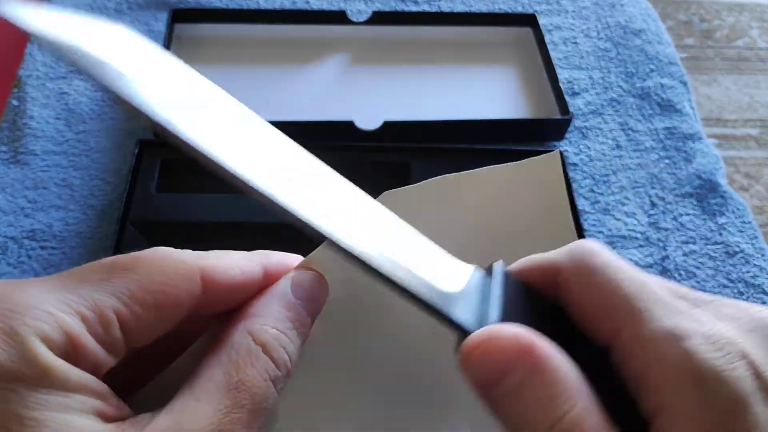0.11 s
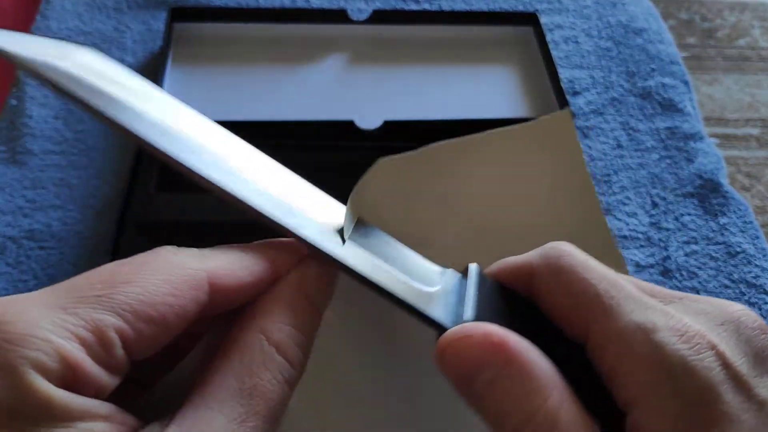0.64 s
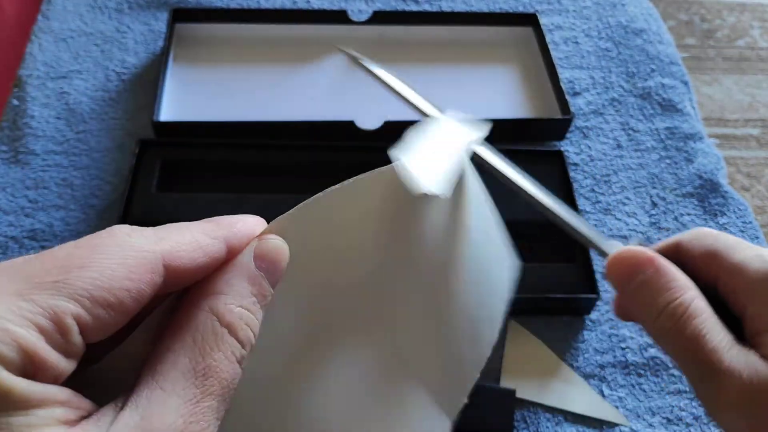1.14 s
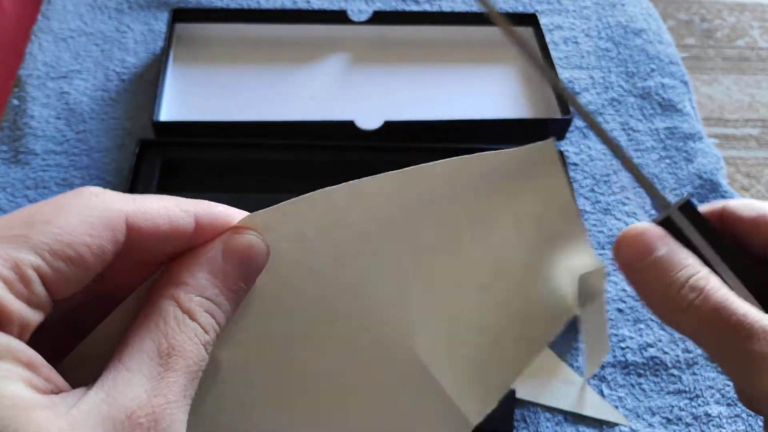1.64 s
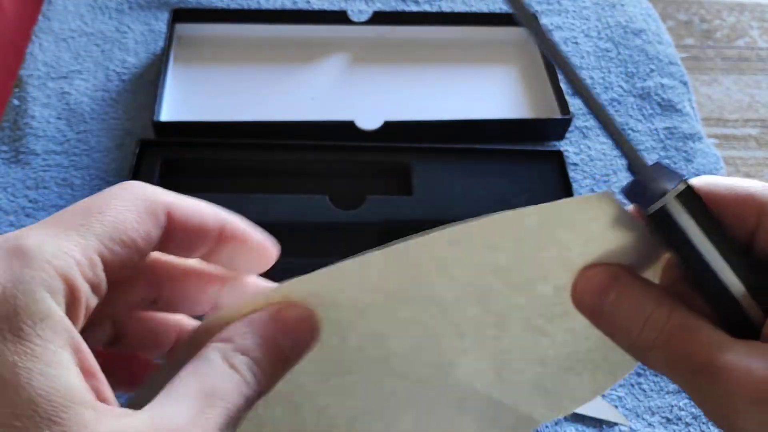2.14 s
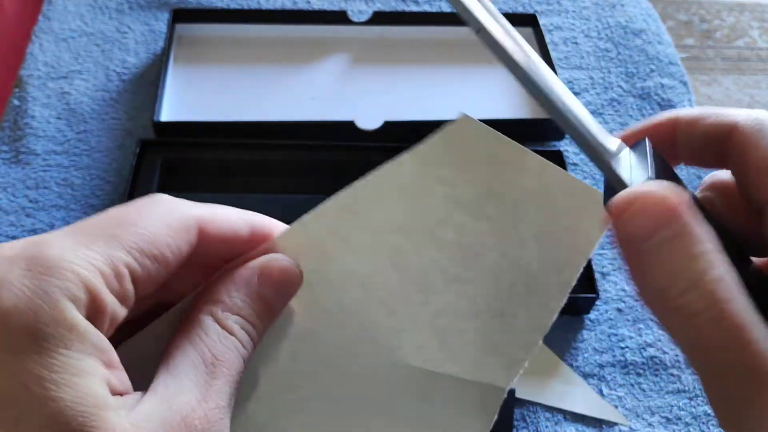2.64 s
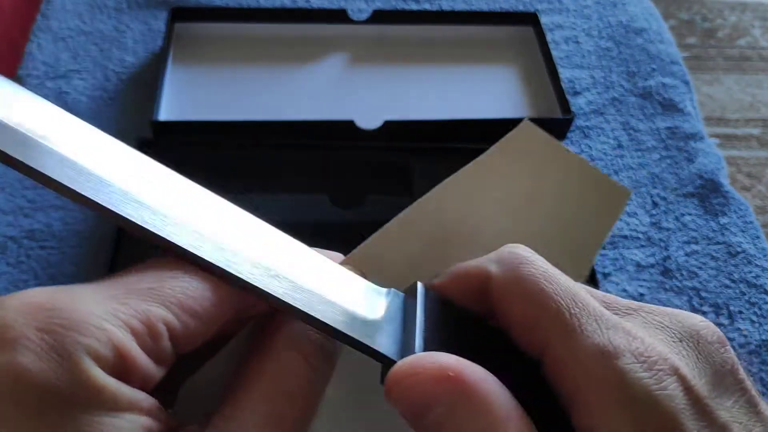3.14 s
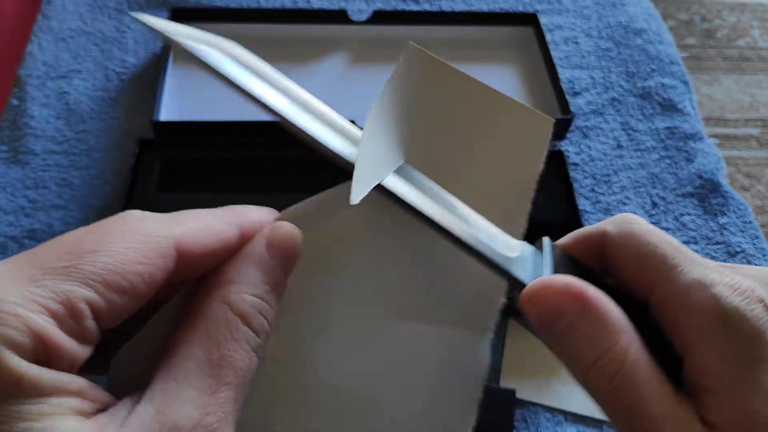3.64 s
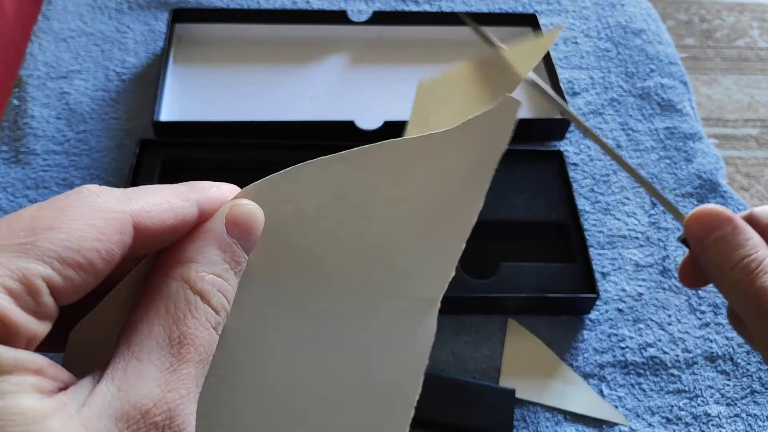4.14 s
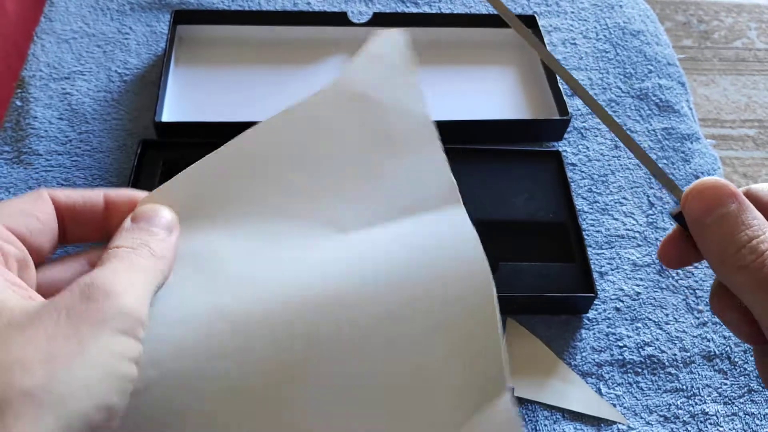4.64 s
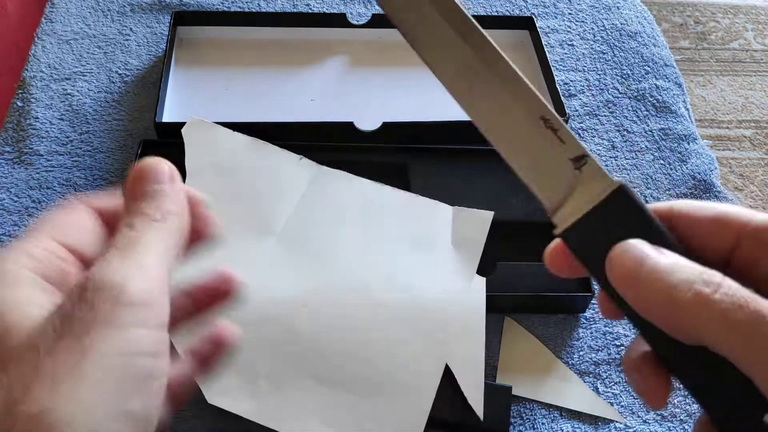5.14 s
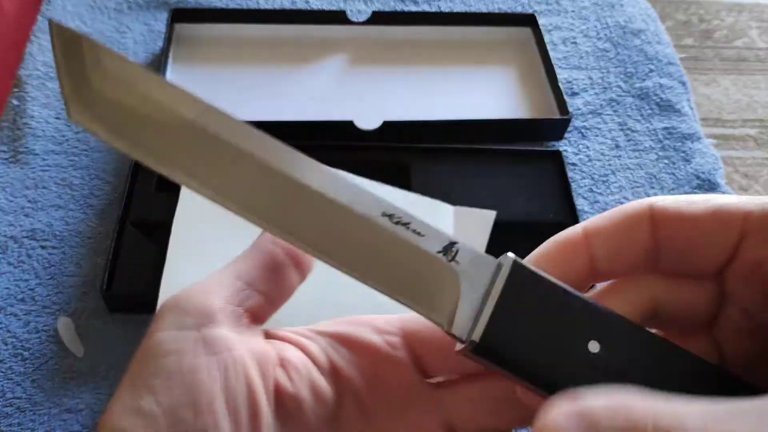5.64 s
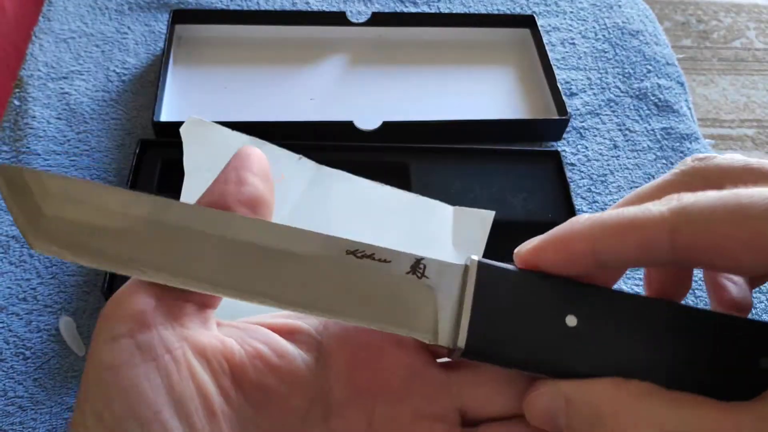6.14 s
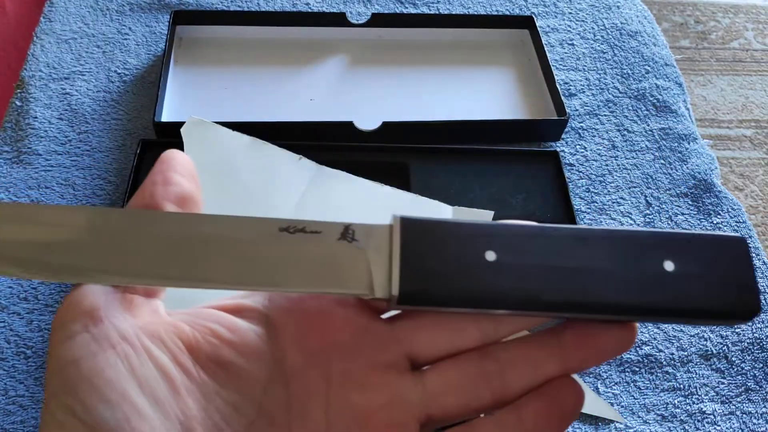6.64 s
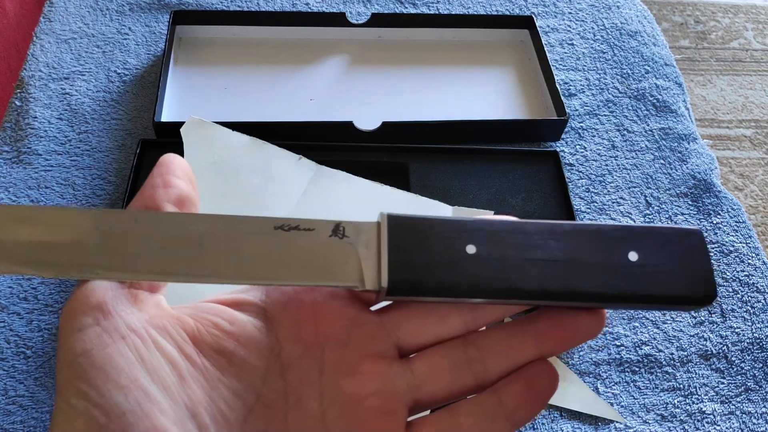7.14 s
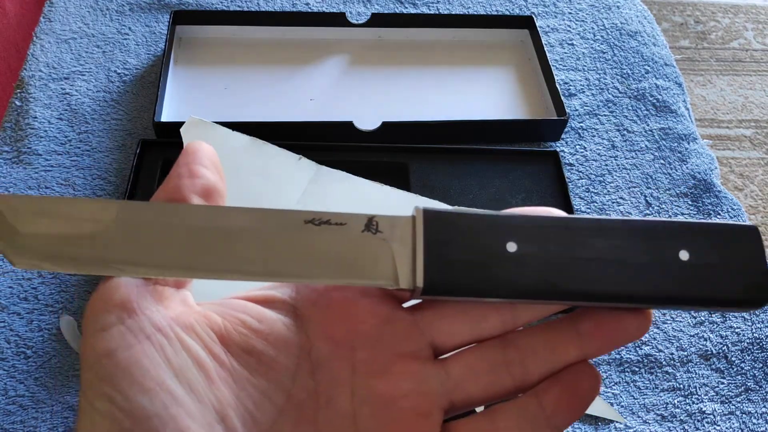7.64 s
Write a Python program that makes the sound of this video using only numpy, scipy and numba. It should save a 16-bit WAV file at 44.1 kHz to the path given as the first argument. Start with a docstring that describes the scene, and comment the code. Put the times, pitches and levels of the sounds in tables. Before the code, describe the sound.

In a quiet furnished room, a blade slices a held sheet of paper with a long, bright, grainy rip ending in a sharp flap. Small rustles, ticks and a firmer paper pop follow, then a second similar cut. The sheet is dropped with a crisp crackle, leaving faint rubs over low rumble and soft hiss. Close phone microphone, left side brighter.

```python
"""Two long tearing cuts through a hand-held sheet of paper, with rustles and ticks between and after them.
Each cut is a dense hail of random snaps, split into bands that swell and fade as the fibres part.
Offcuts drop and fingers slide as a thinner hail; the sheet ticks as it buckles, in cracks and short bursts.
A quiet room adds a soft tail, rumble, drones and hiss. The left port of the phone that listens
is bright; the right one is dull and slightly nearer."""
import sys
import numpy as np
from scipy import signal
from scipy.fft import rfft, irfft, next_fast_len
from scipy.io import wavfile
from scipy.ndimage import uniform_filter1d, map_coordinates
from numba import njit

SR = 44100
rng = np.random.default_rng(int(sys.argv[2]) if len(sys.argv) > 2 else 0)


def master(y):
    """Save y as 16-bit WAV."""
    cut = np.clip(np.atleast_2d(y).T, -1, 1)
    pcm = np.round(cut * 32767)  # scale
    wavfile.write(sys.argv[1], SR, pcm.astype(np.int16))


def gain_from_db(level_db):
    """Turn a decibel level (scalar or array-like) into a linear amplitude factor."""
    decades = np.asarray(level_db, float) / 20
    return 10 ** decades


N = 342656  # length in samples
SIZE = next_fast_len(N + SR // 2, real=True)  # room for the tail after the end
HZ = np.arange(SIZE // 2 + 1) * SR / SIZE + 1e-3  # just above zero, to allow logarithms
TIME = np.arange(N) / SR  # seconds

# Colour of the air rumble. Each row: frequency in Hz, relative level in dB per Hz.
ROOM_TONE = [(12, -32), (20, -3.5), (59, 2), (93, -7.5), (140, -12), (229, -10.5), (296, -16.5), (382, -16),
             (637, -18.5), (776, -15), (982, -15.5), (1320, -16), (2200, -27.5), (2860, -45), (4840, -120)]
# Colour of the microphone hiss. Each row: frequency in Hz, relative level in dB per Hz.
HISS = [(1500, -10), (2400, 1), (3000, 1), (4000, -1), (8000, -2.5), (10000, -1.5), (12500, 2), (14300, 0),
        (15000, -30)]
# Far machinery. Each row: frequency in Hz, width in Hz, level in dB before its slow wander.
DRONES = [(40, 14, -80), (62, 16, -75), (146, 6, -75), (195, 20, -84)]
# Balance of the rumble and hiss. Each row: frequency in Hz, left minus right in dB.
TONE_PORTS = [(300, 0.5), (4000, -0.5), (7000, -3.5), (9500, 1.5), (12500, 12), (14300, 6.5)]
# How alike the room tone is at both ports. Each row: frequency in Hz, common share of the power (0 to 1).
TONE_LIKENESS = [(60, 0.98), (300, 0.28), (700, 0.22), (1400, 0.044), (3000, .02)]

# Balance of the paper sounds. Each row: frequency in Hz, left minus right in dB.
PORTS = [(300, 1), (1500, 1), (3500, -0.5), (6200, -8), (8000, 0.5), (9500, 8), (11000, 20), (12500, 28.5),
         (14300, 25.5)]
# How alike the paper is at both ports. Each row: frequency in Hz, common share of the power (0 to 1).
LIKENESS = [(200, .975), (700, .965), (1400, .93), (2200, .75), (4000, .4), (7000, .1), (14000, .05)]

# Bump, body, scrape and sizzle of the rustle. Each row: lower edge in Hz, upper edge in Hz.
WIDE_BANDS_HZ = [(110, 350), (250, 2800), (3000, 9000), (9000, 14600)]
# Colour of rustles and ticks. Each row: frequency in Hz, relative level in dB per Hz.
SLIDE_COLOUR = [(59, -20.5), (100, 10), (260, -1), (982, -1.5), (1180, -5), (1580, -2), (2950, -0.5),
                (6770, -1.5), (9840, -9.5), (12600, 0), (14300, -1)]
# The sheet or an offcut flaps and dies away. Each row: start in seconds, base time to fall 60 dB in seconds,
# base level in dB, tilt in dB per band towards the treble, centre of the body in Hz.
FLAPS = [(1.144, 0.27, -41, 2.5, 1090), (1.47, 0.1, -57, -5, 880), (1.53, 0.17, -64, 8, 840),
         (1.832, 0.52, -61, -4, 640), (2.156, 0.27, -57, -19, 1310), (3.94, 0.18, -38.5, -1, 1190),
         (4.122, 0.075, -56, -8, 1080), (4.219, .2, -59.5, -3.5, 1050), (4.411, 0.28, -62, 0, 1590),
         (4.45, .25, -57.5, -5, 2030), (4.583, 0.56, -68, 1, 1000), (5.043, .3, -59, -11.5, 1570)]
# How flaps share out over the four bands. Each row: offset in dB, factor on the fall time.
FLAP_BANDS = [(-18, 1.4), (-1, 0.96), (-2, 1.2), (0.5, 0.54)]
# Soft low thuds of hands and sheet. Each row: start in seconds, time to fall 60 dB in seconds,
# base level in dB.
THUDS = [(1.125, 0.18, -48.5), (1.47, .15, -58), (1.535, .15, -58), (1.83, .2, -60.5), (2.55, 0.27, -61.5),
         (3.86, .15, -54.5), (3.915, 0.16, -47.5), (4.06, .2, -63), (5.59, .15, -66)]
# Fingers and paper rub. Each row: start in seconds, length in seconds, base level in dB,
# tilt in dB per band towards the treble, centre of the body in Hz.
RUBS = [(1.239, 0.042, -62.5, 1, 870), (1.269, 0.047, -66, -13.5, 800), (1.296, 0.041, -77, 0, 710),
        (1.496, 0.018, -75, 0.5, 800), (1.532, 0.025, -68, -7, 800), (1.57, 0.15, -72, -4, 750),
        (1.692, 0.21, -71.5, -3.5, 895), (1.919, 0.072, -61, -3, 940), (2.005, 0.21, -68, -2, 680),
        (2.232, 0.21, -69.5, -2.5, 870), (2.443, 0.044, -59, 1, 840), (2.476, 0.082, -59, -4.5, 690),
        (2.538, 0.082, -74, -12.5, 570), (2.608, 0.061, -72, 11, 670), (2.68, 0.084, -74.5, 1, 900),
        (3.053, 0.15, -76.5, 0, 830), (3.972, 0.054, -54, 2, 1250), (4.03, 0.055, -70, -13, 647),
        (4.455, 0.056, -67, 6, 1900), (4.642, 0.19, -74.5, 3, 895), (4.771, 0.078, -72.5, 3, 940),
        (4.999, 0.058, -51, -3.5, 1680), (5.295, 0.21, -79.5, 14.5, 960), (5.6, 0.04, -80.5, 18.5, 965),
        (5.674, 0.13, -79, 11.5, 840), (5.82, 0.21, -75.5, 3.5, 930), (5.756, 0.77, -78, -3.5, 1300),
        (6.105, 0.24, -82.5, -8.5, 983)]
# How rubs share out: one offset in dB for each of the four bands.
RUB_BANDS_DB = [-14.5, 2, -1.5, 2]
# How many times the tilt counts in each of the four bands.
TILT_STEPS = [-1, -1, 0, 1]

# The sheet buckles or lands. Each row: start in seconds, base levels in dB of body, middle and top,
# centre of the body in Hz.
TICKS = [(0.4968, -71, -64, -61, 1490), (1.104, -58, -48, -30, 900), (1.115, -41, -36, -26, 1680),
         (1.1406, -47, -46, -35, 1090), (1.298, -61, -53, -38, 600), (1.3025, -62, -56, -42, 700),
         (1.312, -64, -55, -36, 600), (1.3165, -65, -56, -46, 700), (1.3374, -52.5, -54, -35.5, 750),
         (1.392, -68, -63, -51, 1100), (1.4725, -79, -52, -39, 1610), (1.477, -66, -52, -46, 1500),
         (1.527, -54, -47.5, -50, 735), (1.5964, -69, -61, -51, 926), (1.8344, -43.5, -58, -47, 600),
         (2.1563, -34, -32.5, -65, 1430), (2.16, -42, -26.5, -70, 1920), (2.1684, -38, -55, -63, 1470),
         (2.29, -60, -60, -62, 900), (3.317, -65, -64, -50, 1800), (3.8622, -32.5, -30, -42, 800),
         (3.938, -49, -31, -46, 2500), (4.1247, -63, -45.5, -33.5, 2500), (4.221, -74, -58.5, -65, 1100),
         (4.4099, -66, -48.5, -42.5, 1970), (4.4118, -55.5, -58, -36.5, 2000),
         (4.4273, -60, -53, -52, 1500), (4.4523, -50, -41.5, -35, 2200), (4.469, -63, -63, -51, 2200),
         (4.5809, -63.5, -57, -55, 804), (5.0028, -43, -61, -33, 1920), (5.0058, -45, -42, -24.5, 1900),
         (5.013, -44, -48, -42, 1660), (5.0263, -38, -44, -31, 1860), (5.0326, -43, -45, -48, 1690),
         (5.0432, -59, -34, -50, 2010), (5.0482, -43, -51, -36.5, 1700)]
# Time in seconds for a tick to fall 60 dB, in body, middle and top.
TICK_T60_S = (0.023, 0.016, 0.0068)

# One list per cut. Each row: time in seconds, base tearing level in dB, then in dB over it the body of the
# sheet and the edge sizzle, the sizzle centre in Hz, and the 2.5-5 kHz band in dB over tearing.
STROKES = [
    [(0.49, -60, -5, -4, 12600, -14), (0.508, -47, -11, 2, 12700, -9), (0.56, -42.5, -6, -2, 11500, -13.5),
     (0.592, -37.5, -13.5, -10.5, 12500, -4.5), (0.634, -37.5, -11, -3.5, 11300, -7.5),
     (0.702, -37, -15, 3, 12300, -7), (0.778, -33, -12.5, 1, 12800, -11.5),
     (0.818, -33, -21.5, 4, 13000, -6), (0.86, -34.5, -9, 4, 12500, -8), (0.93, -33, -9.5, -4, 12100, -11),
     (1.03, -35.5, -10.5, 7.5, 11200, -8), (1.092, -38, -6.5, 7.5, 11000, -2.5),
     (1.138, -30, -14, 2.5, 10900, -6.5), (1.144, -37, -9, -0.5, 10840, 1)],
    [(3.312, -58, -12, 0, 12100, -2.5), (3.336, -46.5, -6.5, 1, 11500, -9.5),
     (3.404, -40, -14.5, -5, 13000, -3), (3.464, -40.5, -13.5, 5, 12770, -4),
     (3.518, -35.5, -18, 4, 11900, -6), (3.638, -38.5, -14.5, 1, 12500, -5),
     (3.686, -37, -20.5, -0.5, 12300, -4), (3.718, -40, -8, -1.5, 12200, -2.5),
     (3.784, -38.5, -10, -1.5, 12420, -8), (3.846, -36.5, -11.5, 4, 12100, -5.5),
     (3.86, -37, -8.5, -4.5, 12600, -2), (3.904, -35, -13.5, 4, 13400, -2.5),
     (3.932, -28, -19, -2, 13400, -2), (3.939, -35, -7, -6, 13400, -4)],
]
# Six bands of the cut, from low flap to sizzle. Each row: lower edge in Hz, upper edge in Hz.
BANDS_HZ = [(100, 350), (350, 1000), (1000, 2500), (2500, 5000), (5000, 9000), (9000, 14300)]
# How the cut drives those bands. Each row: offset in dB, share of the body control, share of the sizzle control.
STROKE_BANDS = [(-13, 1, 0.14), (-3.5, 1, 0.18), (-6.5, .4, 0.17), (0, 0, 0), (-4, 0.3, 0), (2.5, 0, 1)]
# Colour of the tearing. Each row: frequency in Hz, relative level in dB per Hz.
CUT_COLOUR = [(47, -47.5), (80, -20), (294, -18.5), (399, -13), (435, -17), (642, -7), (991, -10),
              (1430, -2.5), (2690, -5.5), (3720, -1), (5390, 0), (6270, 2.5), (9070, -0.5), (12600, 4),
              (14300, 6.5)]

TONE_DB, HISS_DB = -64.5, -73.5  # rumble and hiss, before slow wander and port balance
ROOM_DB, ROOM_T60_LOW_S, ROOM_T60_HIGH_S = -15, 0.59, 0.55  # T60: time to fall 60 dB
LEFT_LAG_S = .00009  # sound reaches the left port later
FLAP_RISE_S, THUD_RISE_S = 0.0031, 0.0091
RUB_POINTED = 0.93  # 0 flat, larger = narrower crest
RUB_EARLY = 0.76  # below 1 the crest comes before the middle
SNAP_DB = 12  # one-sample crack over the start of its burst, before filtering
TOP_HZ = 13900


def shape(table):
    """Reads a (Hz, value) table at every spectral line, evenly along log frequency."""
    hz, value = np.transpose(table)
    return np.interp(np.log(HZ), np.log(hz), value)


def filtered(x, gain):
    """Passes the signal through a spectral gain."""
    return irfft(rfft(x, SIZE) * gain, SIZE)[..., :N]


def band(lo_hz, hi_hz):
    """Lets a range of frequencies through, with soft edges."""
    return 1 / np.sqrt((1 + (lo_hz / HZ) ** 8) * (1 + (HZ / hi_hz) ** 8))


def unit(gain):
    """Scales a spectral gain so that white noise keeps its power."""
    return gain / np.sqrt(np.mean(gain ** 2))


def split(x, colour, bands):
    """Colours a signal and splits it; white noise would keep its power in each band."""
    tint = gain_from_db(shape(colour))
    return [filtered(x, unit(tint * band(*edges))) for edges in bands]


def pair(sizes, likeness):
    """Gives both ports the same grain sizes, partly with common and partly with unrelated noise."""
    common, left, right = rfft(sizes * rng.standard_normal((3, N)), SIZE)
    share = np.clip(shape(likeness), 0, 1)
    late = common * np.exp(-2j * np.pi * HZ * LEFT_LAG_S)
    alike = np.sqrt(share) * np.array([late, common])
    unrelated = np.sqrt(1 - share) * np.array([left, right])
    return irfft(alike + unrelated, SIZE)[:, :N]


def ports(x, table):
    """Sets the left-right balance by frequency; the summed power of equal inputs stays."""
    ratio = gain_from_db(shape(table))
    balance = np.array([ratio, np.ones_like(ratio)]) * np.sqrt(2 / (1 + ratio ** 2))
    return filtered(x, balance)


def walk(rate):
    """Wanders at random: levels held for 1 / rate seconds, then smoothed twice; spread near 1."""
    k = int(SR / rate)
    steps = np.repeat(rng.standard_normal(N // k + 1), k)
    return 1.3 * uniform_filter1d(uniform_filter1d(steps, k), k)[:N]


def snaps(rate, spread_db, clump_db):
    """Draws sizes of fibre snaps: many small, few large, in clumps; rate per second, mean power 1."""
    happens = rng.random(N) < rate / SR
    size_db = spread_db * rng.exponential(size=N) + clump_db * walk(350)
    sizes = happens * gain_from_db(size_db)
    return sizes / np.sqrt(np.mean(sizes ** 2))


def bending(x, patch_s, patch_hz, depth_db):
    """The sheet keeps changing its curve, so its resonances come, drift and go: a random gain field."""
    hz, s, frames = signal.stft(x, SR, nperseg=512)
    grid = rng.standard_normal((256, 512))
    places = np.meshgrid(hz / patch_hz, s / patch_s, indexing="ij")
    gain = gain_from_db(depth_db * map_coordinates(grid, places, order=1))
    return signal.istft(frames * unit(gain), SR, nperseg=512)[1][:, :N]


@njit
def svf(x, hz, width):
    """Band-pass filter with a moving centre, gain 1 at the centre."""
    y, b, l = np.empty(len(x)), 0., 0.  # b and l: its two memories
    for i in range(len(x)):
        g, k = np.tan(np.pi * hz[i] / SR), width[i] / hz[i]
        v = (b + g * (x[i] - l)) / (1 + g * (g + k))
        b, l, y[i] = 2 * v - b, l + 2 * g * v, k * v
    return y


def resonate(x, hz, width):
    """Passes both ports through one moving resonance."""
    return np.array([svf(side, hz, width) for side in x])


def held(rows, column):
    """Holds the value of the latest event until the next; the first value also comes before it."""
    rows = rows[np.argsort(rows[:, 0])]
    latest = np.searchsorted(rows[:, 0], TIME) - 1
    return rows[np.clip(latest, 0, None), column]


def curve(tables, column, rest):
    """Draws one column of several tables along time, resting between them."""
    out = np.full(N, float(rest))
    for table in map(np.array, tables):
        inside = (TIME >= table[0, 0]) & (TIME <= table[-1, 0])
        out[inside] = np.interp(TIME[inside], table[:, 0], table[:, column])
    return out


def room_tone():
    """Air rumble, microphone hiss and far drones: filtered noise whose level slowly wanders."""
    air = pair(gain_from_db(0.15 * walk(0.4)), TONE_LIKENESS)
    rumble = gain_from_db(TONE_DB) * unit(gain_from_db(shape(ROOM_TONE)))
    hiss = gain_from_db(HISS_DB) * unit(gain_from_db(shape(HISS)))
    hum = pair(gain_from_db(0.8 * walk(0.54)), TONE_LIKENESS)
    drones = sum(gain_from_db(db) * unit(1 / (1 + (2 * (HZ - hz) / width) ** 2)) for hz, width, db in DRONES)
    return ports(filtered(air, rumble + hiss), TONE_PORTS) + filtered(hum, drones)


def room(x):
    """A furnished room answers with a soft noise tail, more alike in the bass; its treble dies sooner."""
    t = TIME[:SR // 2]
    noise = pair(np.ones(N), LIKENESS)[:, :len(t)] * np.clip(t / 0.012, 0, 1)
    low = uniform_filter1d(noise, size=9)
    high = noise - low
    tail = low * gain_from_db(-60 * t / ROOM_T60_LOW_S) + high * gain_from_db(-60 * t / ROOM_T60_HIGH_S)
    tail = tail / np.sqrt(np.sum(tail ** 2, axis=1, keepdims=True))
    return gain_from_db(ROOM_DB) * filtered(x, rfft(tail, SIZE))


def handling():
    """Strength of the four bands of rustle: flaps and thuds jump up and die away, rubs swell and fade."""
    power, steps = np.zeros((4, N)), np.array(TILT_STEPS)[:, None]
    flap_db, longer = np.transpose(FLAP_BANDS)[:, :, None]
    for s, t60, db, tilt_db, _ in FLAPS:
        start = int(s * SR)
        t = TIME[:min(SR // 2, N - start)]
        fall_db = db + flap_db + tilt_db * steps - 60 * t / (t60 * longer)
        flap = np.clip(t / FLAP_RISE_S, 0, 1) * gain_from_db(fall_db)
        power[:, start:start + len(t)] += flap ** 2
    for s, t60, db in THUDS:
        start = int(s * SR)
        t = TIME[:SR // 2]
        thud = np.clip(t / THUD_RISE_S, 0, 1) * gain_from_db(db - 60 * t / t60)
        power[0, start:start + len(t)] += thud ** 2  # lowest band only
    for s, length, db, tilt_db, _ in RUBS:
        start = int(s * SR)
        progress = np.linspace(0, 1, max(int(length * SR), 2))
        swell = np.sin(np.pi * progress ** RUB_EARLY).clip(0) ** RUB_POINTED
        rub = swell * gain_from_db(db + np.array(RUB_BANDS_DB)[:, None] + tilt_db * steps)
        power[:, start:start + len(swell)] += rub ** 2
    return np.sqrt(power)


def sliding():
    """Skin and paper drag over paper: a thinner, patchier hail, shaped by the handling."""
    hail = bending(pair(snaps(14000, 1.6, 0.6), LIKENESS), patch_s=0.02, patch_hz=340, depth_db=2.4)
    layers = split(hail, SLIDE_COLOUR, WIDE_BANDS_HZ)
    centre = uniform_filter1d(held(np.array(FLAPS + RUBS), column=4), size=400)
    layers[1] = 0.65 * resonate(layers[1], centre, 1.1 * centre)
    return np.sqrt(2) * sum(x * gain for x, gain in zip(layers, handling()))


def ticking():
    """Each buckle is a snap and a dying burst; the body of the sheet rings longer than its treble."""
    burst = pair(np.ones(N), LIKENESS)
    rows = np.array(TICKS)
    starts = (rows[:, 0] * SR).astype(int)
    sign = rng.choice([-1, 1], len(rows))
    after = TIME[:SR // 8]
    layers = []
    for k, (edges, t60) in enumerate(zip(WIDE_BANDS_HZ[1:], TICK_T60_S)):
        level_db = rows[:, 1 + k]
        envelope, snap = np.zeros((2, N))
        for start, db in zip(starts, level_db):
            envelope[start:start + len(after)] += gain_from_db(db - 60 * after / t60)
        snap[starts] = sign * gain_from_db(level_db + SNAP_DB)
        late = np.roll(snap, int(LEFT_LAG_S * SR))
        layers += split(burst * envelope + np.array([late, snap]), SLIDE_COLOUR, [edges])
    body, middle, top = layers
    centre = held(rows, column=4)
    return 1.5 * resonate(body, centre, 0.93 * centre) + middle + top


def cutting():
    """Parting fibres drive the sheet; the free edge by the blade sings at a pitch that moves along the cut."""
    hail = pair(snaps(36000, 1.1, 0.8), LIKENESS)
    hail = bending(hail, patch_s=.06, patch_hz=170, depth_db=3.0)
    layers = split(hail, CUT_COLOUR, BANDS_HZ)
    level = curve(STROKES, 1, rest=-150)
    body = curve(STROKES, 2, rest=0)
    sizzle = curve(STROKES, 3, rest=0)
    centre = curve(STROKES, 4, rest=12000)
    middle = curve(STROKES, 5, rest=0)
    layers[5] = .4 * layers[5] + resonate(layers[5], centre, .25 * centre)
    layers[3] = layers[3] * gain_from_db(middle)
    cut = 0
    for x, (db, low, top) in zip(layers, STROKE_BANDS):
        cut = cut + x * gain_from_db(level + db + low * body + top * sizzle)
    return np.sqrt(2) * cut


def scene():
    """Paper sounds, direct and from the room, over the room tone."""
    paper = cutting() + sliding() + ticking()
    return ports(paper + room(paper), PORTS) + room_tone()


def band_limit(x):
    """A steep low-pass at the top of the band."""
    return signal.sosfilt(signal.butter(12, 15540, fs=SR, output="sos"), x)


def record(dry):
    """A sharp low-pass removes the top of the finished mix."""
    low_pass = signal.ellip(8, .3, 58, TOP_HZ, fs=SR, output="sos")
    mix = signal.sosfilt(low_pass, dry)
    return band_limit(mix)


dry = scene()
out = record(dry)
master(out)
```